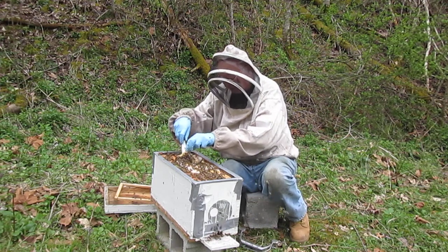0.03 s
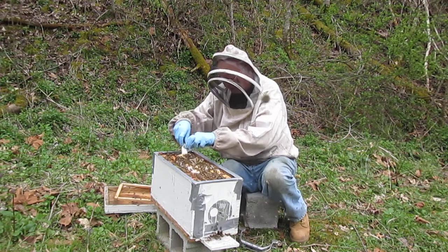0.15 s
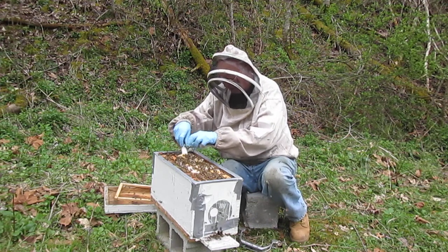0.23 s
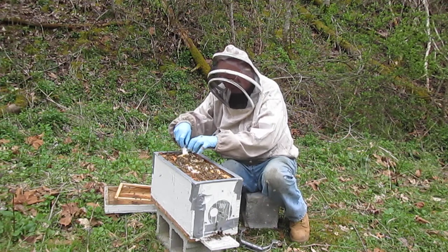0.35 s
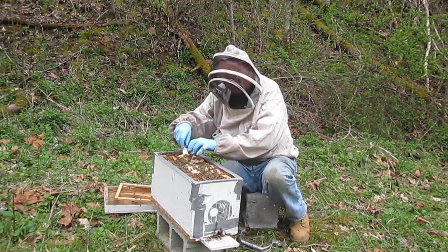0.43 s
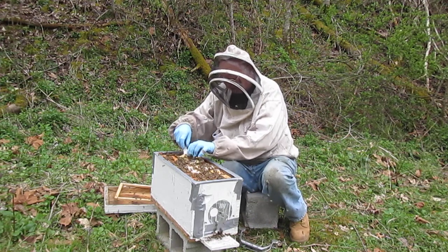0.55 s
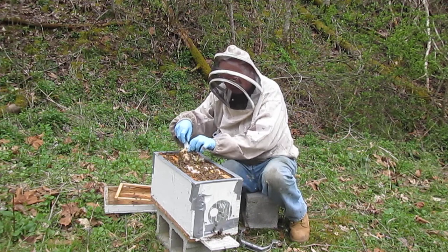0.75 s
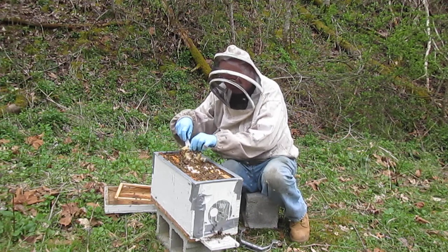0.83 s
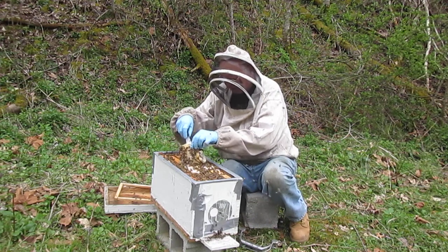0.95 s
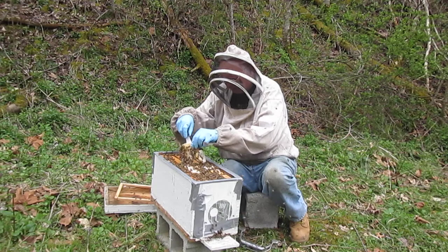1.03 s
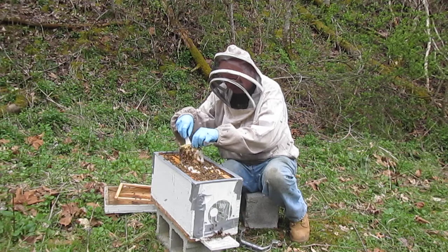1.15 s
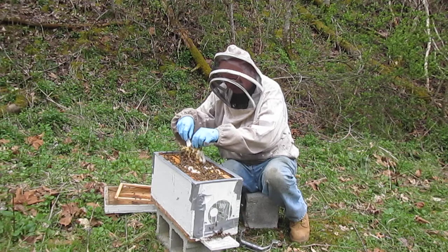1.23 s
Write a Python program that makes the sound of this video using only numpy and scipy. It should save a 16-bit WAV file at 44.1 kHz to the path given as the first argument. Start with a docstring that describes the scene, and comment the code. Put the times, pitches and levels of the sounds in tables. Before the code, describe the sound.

A bee clicks against the microphone and buzzes briefly, over a faint hive hum.

```python
"""Honeybee at an open hive

A colony hums, the sum of many unsynchronised wingbeats, over outdoor hiss and light wind.
One bee darts up and strikes a camera, whose shell rings with a click. Its periodic wing strokes
buzz twice across the microphone and fade as it flies off. The knock pushes the recorder's
automatic gain down, and the background slowly swells back."""
import sys
import numpy as np
from scipy import signal
from scipy.fft import rfft, irfft
from scipy.io import wavfile
from scipy.ndimage import uniform_filter1d, map_coordinates

SR = 44100
rng = np.random.default_rng(int(sys.argv[2]) if len(sys.argv) > 2 else 0)


def put_to_file(sound):
    """Save the sound as 16-bit audio at rate SR, in the file named by the first command-line argument."""
    columns = np.atleast_2d(sound).T  # one column per channel
    safe = np.clip(columns, -1, 1)
    whole_steps = np.round(safe * 32767)
    wavfile.write(sys.argv[1], SR, whole_steps.astype(np.int16))


N = 57330


def undb(db):
    """Decibels to amplitude ratio."""
    return 10 ** (np.asarray(db) / 20)


def unit(x):
    """Normalisation to rms 1."""
    return x / np.sqrt(np.mean(x ** 2))


def gain_at(hz, spectrum):
    """Gain of a spectral envelope, interpolated in decibels over log frequency."""
    corner_hz, db = np.array(spectrum).T
    return undb(np.interp(np.log(hz + 1e-9), np.log(corner_hz), db))


def noise(spectrum):
    """Spectral shaping: white noise takes on the given envelope, at rms 1."""
    white = rfft(rng.standard_normal(N))
    bin_hz = np.arange(N // 2 + 1) * SR / N
    return unit(irfft(white * gain_at(bin_hz, spectrum), N))


def wander(rate_hz):
    """Smooth random modulation with a spread near 1, changing about rate_hz times a second."""
    steps = rng.standard_normal(2048)
    return map_coordinates(steps, [np.arange(N) / SR * rate_hz + 2], order=3, mode="mirror")


def swells(t, table):
    """Amplitude envelope made of Gaussian pulses."""
    return sum(undb(db) * np.exp(-.5 * ((t - at) / width) ** 2) for at, db, width in table)


# envelope of the colony's harmonics: frequency_hz, relative_db
COLONY_SPECTRUM = [(250, -4), (520, 2), (780, -11), (1150, -9.5), (1600, -14.5), (2200, -24), (3200, -24.5),
                   (4500, -40.5)]

def colony(bees=14, low_hz=227.5, high_hz=285.4, drift=.025, level_db=-41.5):
    """Incoherent summation: bees, each drifting in wingbeat and loudness, merge into a hum."""
    hum = np.zeros(N)
    for wing_hz in np.linspace(low_hz, high_hz, bees):
        phase = 2 * np.pi * np.cumsum(wing_hz * (1 + drift * wander(9))) / SR
        offsets = rng.uniform(0, 2 * np.pi, 14)
        buzz = sum(gain_at(k * wing_hz, COLONY_SPECTRUM) * np.cos(k * phase + offset)
                   for k, offset in enumerate(offsets, 1))
        hum += undb(4.15 * wander(7.06)) * buzz
    return undb(level_db) * unit(hum)


# spectral densities of the outdoor hiss and the wind: frequency_hz, relative_db
HISS_SPECTRUM = [(100, 2.5), (170, 4.5), (500, 2.5), (1200, -0.5), (2400, -15.5), (4000, -17.5),
                 (6500, -20), (11000, -25), (15500, -35)]
WIND_SPECTRUM = [(12, -5.5), (25, -2), (48, -1.5), (75, -6), (110, -15.5), (200, -35), (500, -63.5)]
# gusts on top of the steady wind: peak_s, level_db, width_s
WIND_GUSTS = [(0.169, -29.5, 0.01), (0.236, -27, 0.01), (0.549, -31.5, 0.021), (1.17, -26, 0.013),
              (1.24, -32.5, 0.011)]

def outdoors(t, hiss_db=-44, wind_db=-39.5):
    """Turbulent pressure: wind buffets the microphone with a low rumble, under stationary hiss."""
    hiss = undb(hiss_db) * noise(HISS_SPECTRUM)
    wind = (undb(wind_db) + swells(t, WIND_GUSTS)) * noise(WIND_SPECTRUM)
    return hiss + wind


# the bee's flight, each level relative within its own layer:
# time_s, wingbeat_hz, first_harmonic_db, second_db, third_db, low_rasp_db, high_rasp_db, hiss_db
FLIGHT_PATH = [(0.262, 214.3, -15, -13.5, -24, -27.5, -42.5, -37),
               (0.274, 226.3, -11, -37.5, -14.5, -36, -30.5, -43),
               (0.286, 237.8, -10.5, -25, -26, -30.5, -23, -38),
               (0.31, 235.9, -10.5, -17, -17.5, -31.5, -30, -35.5),
               (0.324, 232.0, -13, -13, -21.5, -22.5, -37.5, -44),
               (0.352, 230.7, -23, -21, -28.5, -34, -34.5, -47.5),
               (0.368, 240.5, -7.5, -10.5, -18, -21.5, -28, -43),
               (0.392, 232.7, -7, -12, -31, -19.5, -30, -46),
               (0.4, 230.3, -4, -13.5, -24.5, -29.5, -54, -46),
               (0.41, 227.7, -8.5, -14, -13.5, -26.5, -29.5, -49),
               (0.426, 229.6, -18.5, -23.5, -37, -42, -44.5, -52.5),
               (0.458, 239.7, -25.5, -27.5, -35.5, -40, -49.5, -54.5),
               (0.482, 235.6, -35, -32.5, -65, -50.5, -57.5, -67),
               (0.498, 226.3, -37, -42, -47, -52, -52.5, -71),
               (0.524, 225.8, -43.5, -53.5, -50, -57, -64.5, -83),
               (0.56, 227.1, -51.5, -56, -59.5, -63.5, -65, -74)]
# envelopes of the wing stroke's rasping and nasal overtones: frequency_hz, relative_db
RASP_SPECTRUM = [(930, -0.5), (1180, 1), (1420, -2.5), (1650, -3.5), (1900, -9), (2150, -14.5), (2500, -20),
                 (3100, -25.5), (4000, -30), (6000, -36)]
NASAL_SPECTRUM = [(1900, -18), (2150, 1), (2400, 2), (2650, 0.5), (2900, -16), (3100, -7), (3600, -13.5)]
# spectral densities of torn air, wing-reversal ticks and downwash: frequency_hz, relative_db
AIR_SPECTRUM = [(300, 4), (900, 17.5), (2000, 11), (4000, -4), (6500, -2), (10000, -7.5), (13000, -9),
                (16000, -15.5)]
TICK_SPECTRUM = [(2000, -13.5), (4000, -1.5), (7000, 0), (11000, 0.5), (15500, -11)]
DOWNWASH_SPECTRUM = [(20, -8), (55, -4), (120, -9.5), (175, -1), (320, -8), (600, -15), (1200, -29.5),
                     (3000, -63)]
# turns that brighten the buzz, and puffs of downwash on the microphone: peak_s, level_db, width_s
BODY_TURNS = [(0.375, -32, .014), (0.461, -38, 0.012)]
DOWNWASH_PUFFS = [(0.259, -3.5, 0.0058), (0.325, -12.5, 0.025), (0.399, -7.5, 0.021), (0.444, -20, 0.03)]

def near_bee(t, arrive_s=.254, approach_s=.0037, leave_db_per_s=42.5, jitter=.012):
    """Periodic forcing: wing strokes radiate a harmonic series and pulse the noise of the air."""
    time_s, wingbeat_hz, *levels = np.array(FLIGHT_PATH).T
    approach = 1 / (1 + np.maximum(arrive_s - t, 0) / approach_s) ** 2
    departure = undb(-leave_db_per_s * np.maximum(t - time_s[-1], 0))
    nearness = approach * departure
    first, second, third, low, high, hiss = (nearness * undb(np.interp(t, time_s, db)) for db in levels)
    pitch_hz = np.interp(t, time_s, wingbeat_hz) * (1 + jitter * wander(199.14))
    phase = 2 * np.pi * np.cumsum(pitch_hz) / SR

    def overtones(orders, spectrum, flutter_db=3.5):
        """Amplitude modulation: each harmonic flutters on its own as the body turns."""
        return unit(sum(-gain_at(k * pitch_hz, spectrum) * undb(flutter_db * wander(40))
                        * np.cos(k * phase) for k in orders))

    drone = -first * np.cos(phase) - second * np.sin(2 * phase) - third * np.cos(3 * phase)
    rasp = undb(11) * low * overtones(range(4, 6), RASP_SPECTRUM)
    rasp += undb(13) * high * overtones(range(6, 22), RASP_SPECTRUM)
    nasal = swells(t, BODY_TURNS) * overtones(range(9, 15), NASAL_SPECTRUM)
    torn_air = undb(18.5) * noise(AIR_SPECTRUM) * (1 + .23 * np.cos(phase))
    reversals = np.exp(9 * np.cos(phase))  # one narrow pulse per wingbeat
    ticks = undb(1.5) * unit(noise(TICK_SPECTRUM) * reversals * undb(6.5 * wander(230)))
    downwash = swells(t, DOWNWASH_PUFFS) * noise(DOWNWASH_SPECTRUM)
    return undb(13) * drone + rasp + nasal + hiss * (torn_air + ticks) + downwash


# the bee's contacts with the camera: start_s, relative_db, push_ms
CONTACTS = [(0.2495, 12, 0.026), (0.2501, 3.5, .03), (0.2533, 6.5, 0.16)]
# modes of the camera shell: frequency_hz, relative_db, t60_s
SHELL_MODES = [(206, -9.5, 0.039), (463, -8.5, .03), (1250, -10, 0.0057), (2294, -6.5, 0.0074),
               (2860, -2.5, 0.0067), (3480, -9, 0.0062), (5980, -10, 0.0048), (6360, -8, 0.004),
               (8960, -10, 0.005), (9350, -8, 0.0086), (9990, -9.5, 0.006), (11920, -18, .006)]

def knock(t, scrape_db=-11.5, scrape_decay_s=.0018):
    """Impact excitation: each contact scrapes the shell and sets its damped modes ringing."""
    clicks = np.zeros(N)
    for start_s, contact_db, push_ms in CONTACTS:
        age = np.maximum(t - start_s, 0)
        ring = sum(undb(db - 60 * age / t60) * np.sin(2 * np.pi * hz * age)
                   for hz, db, t60 in SHELL_MODES)
        scrape = undb(scrape_db) * (t > start_s) * np.exp(-age / scrape_decay_s) * rng.standard_normal(N)
        cutoff_hz = 1000 / push_ms  # a longer push gives a duller click
        pole = np.exp(-2 * np.pi * cutoff_hz / SR)
        clicks += undb(contact_db) * signal.lfilter([1 - pole], [1, -pole], ring + scrape)
    return clicks


def scene():
    """Superposition: the pressures of all sources add at one microphone."""
    t = np.arange(N) / SR
    return (near_bee(t) + knock(t) + colony() + outdoors(t))[None]


def record(dry, threshold_rms=.54, detect_s=.0029, recover_db_per_s=10.5, cutoff_hz=15900):
    """Automatic gain control with fast attack and slow release, then soft clipping and a low-pass."""
    power = uniform_filter1d(dry[0] ** 2, int(detect_s * SR) + 1)
    excess_db = 10 * np.log10(np.maximum(power / threshold_rms ** 2, 1))
    recovery_db = recover_db_per_s * np.arange(N) / SR
    reduction_db = np.maximum.accumulate(excess_db + recovery_db) - recovery_db
    ducked = dry * undb(-reduction_db)
    rounded = ducked / (1 + ducked ** 8) ** (1 / 8)
    lowpass = signal.ellip(8, .2, 80, cutoff_hz, fs=SR, output="sos")
    return signal.sosfilt(lowpass, rounded)


dry = scene()
out = record(dry)
put_to_file(out)
```